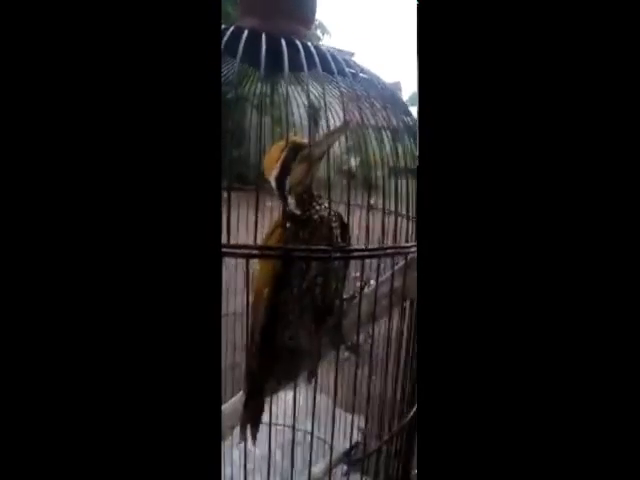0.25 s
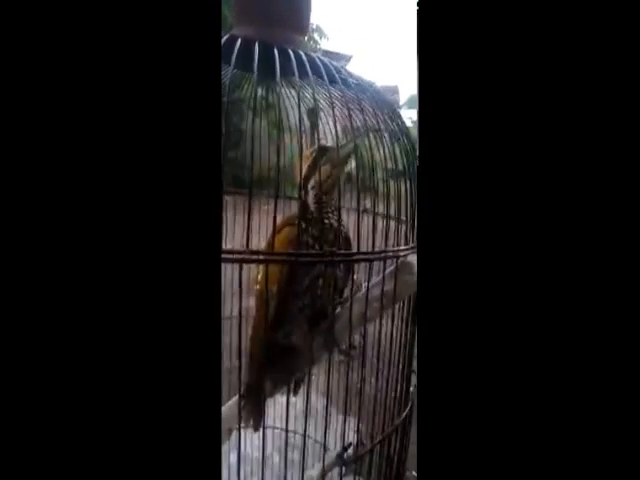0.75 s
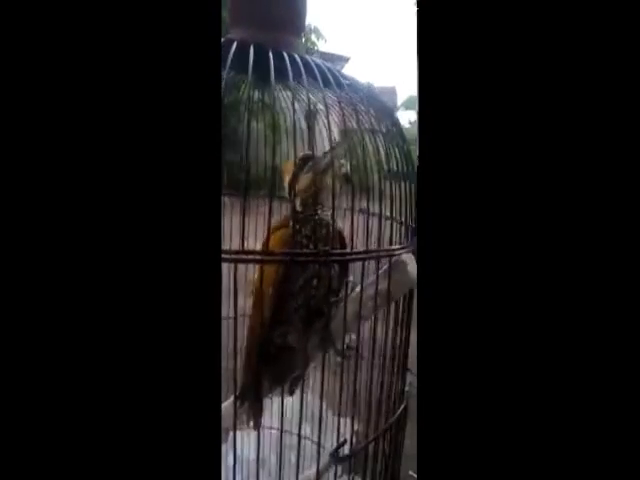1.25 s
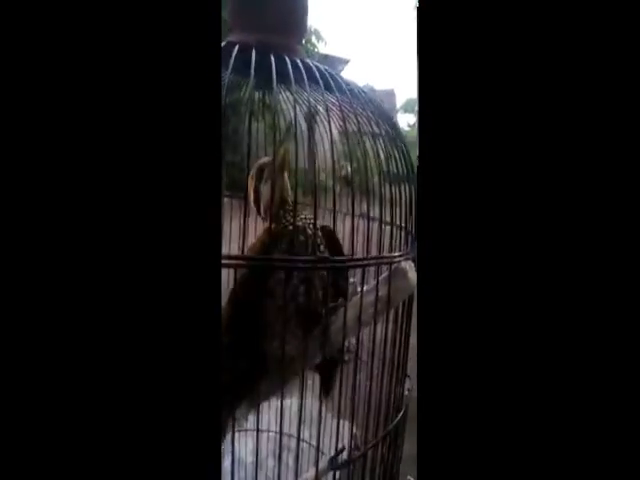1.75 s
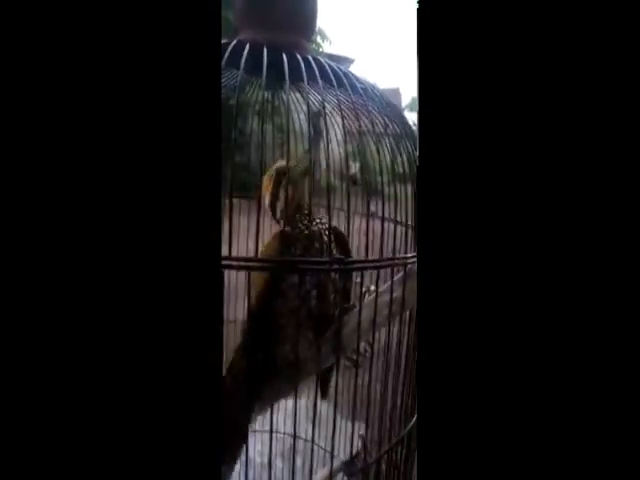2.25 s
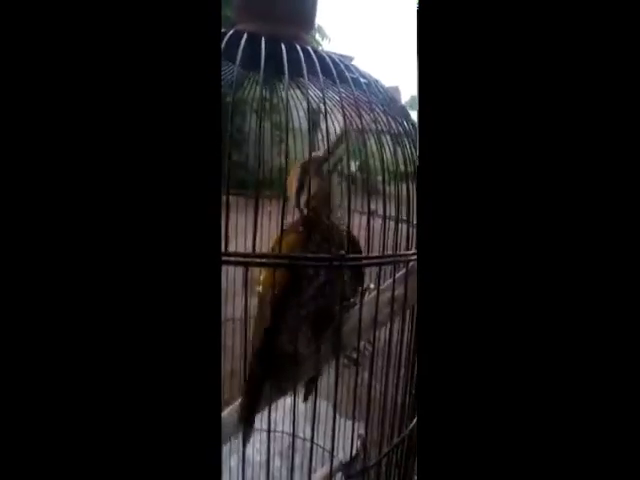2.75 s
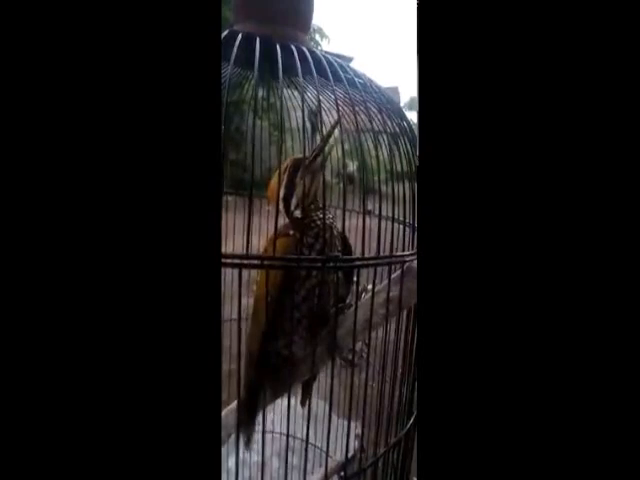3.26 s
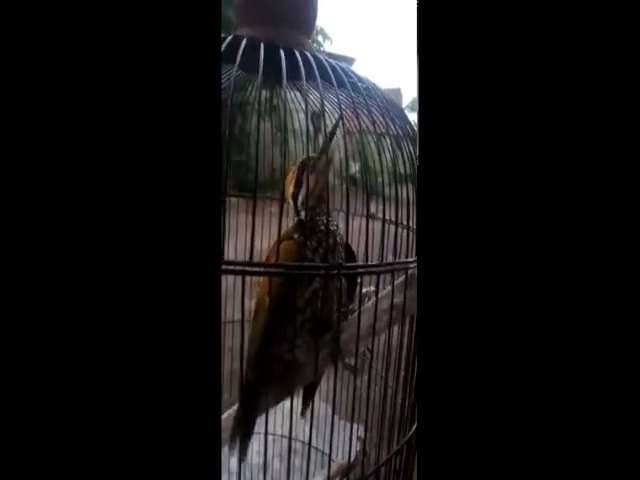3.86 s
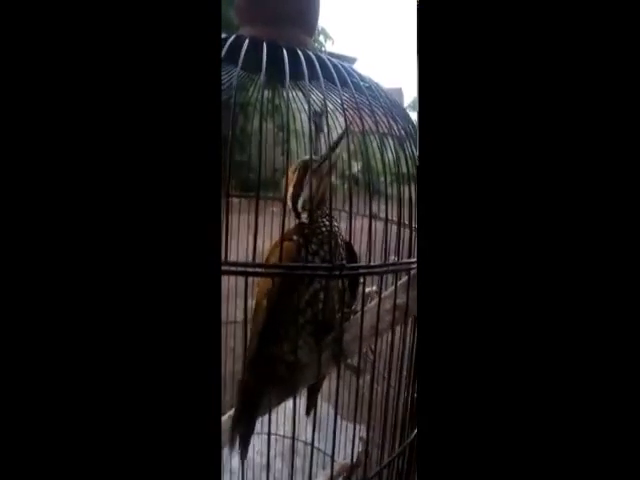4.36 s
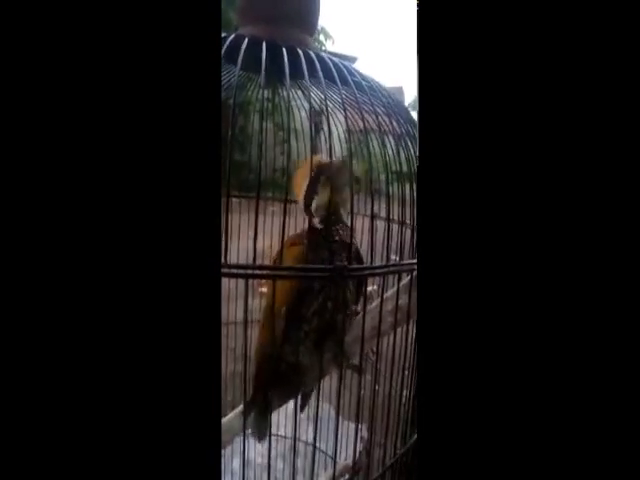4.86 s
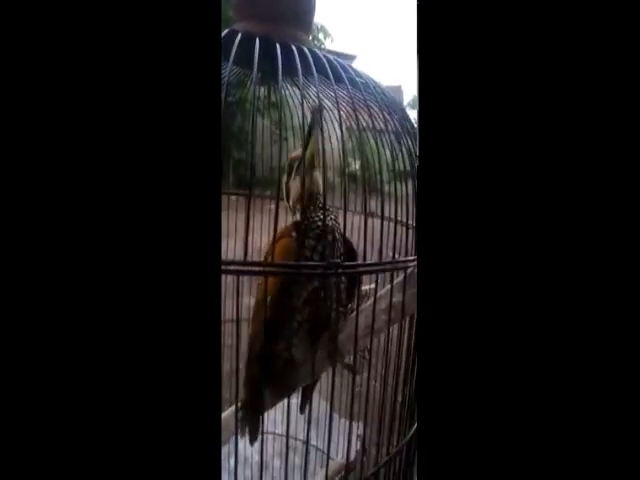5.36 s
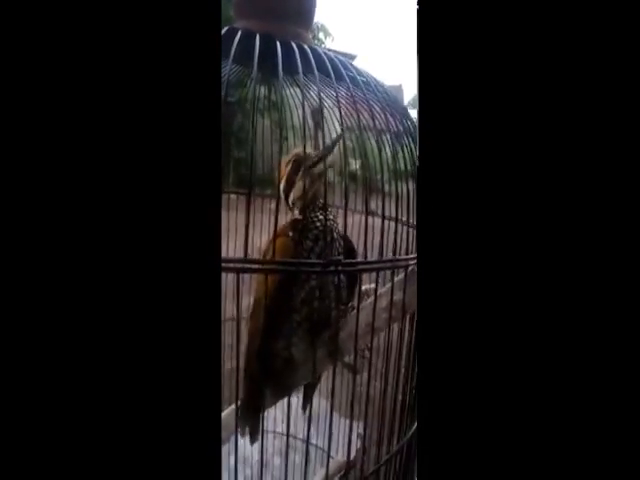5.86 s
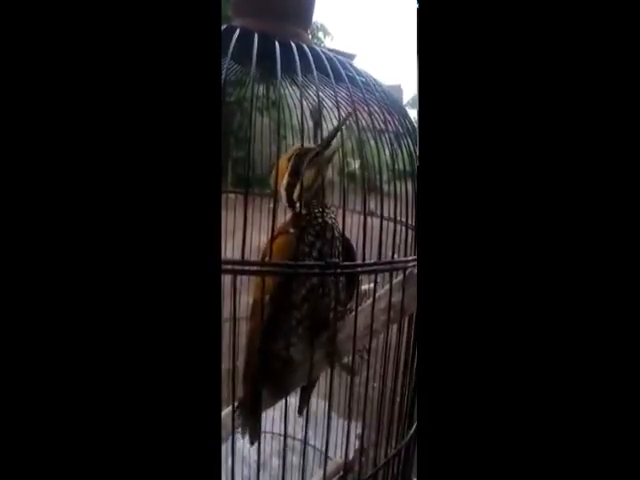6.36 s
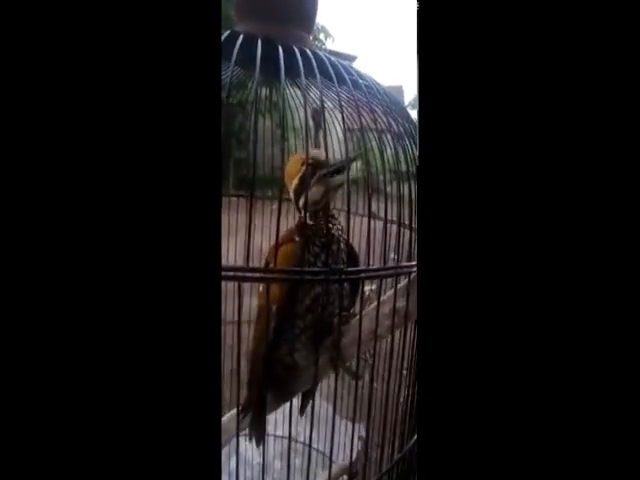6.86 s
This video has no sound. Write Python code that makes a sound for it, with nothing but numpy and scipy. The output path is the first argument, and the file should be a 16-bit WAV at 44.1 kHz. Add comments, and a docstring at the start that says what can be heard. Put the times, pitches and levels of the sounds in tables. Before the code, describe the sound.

On a lightly reverberant porch with dull town rumble, small birds squawk, peep and whistle faintly while a rooster crows far off. Then a caged woodpecker, very close and left of centre, bursts into a rapid chain of short, arched, raspy notes, some cracking into screeches. Late on, the rooster and a whip-like call return beneath the continuing rattle.

```python
"""A bird squawks at once, a higher one squealing over it: gliding tones with overtones, smeared by reflections.
Thin peeps follow, a rooster crows far off, hoarse and wavering, and a whip call and far whistles pass.
Then a woodpecker in a wire cage on a porch rattles, a dozen arched notes a second: swooping, sagging harmonics
with rasps, puffs, sizzle and cracks of noise. Late in the rattle the rooster and a whip call come again.
Throughout, shaped noise gives the low rumble of a town."""
import sys
import numpy as np
from scipy import signal
from scipy.fft import rfft, irfft, next_fast_len
from scipy.io import wavfile

SR = 44100
rng = np.random.default_rng(int(sys.argv[2]) if len(sys.argv) > 2 else 0)


def materialize(psi):
    """Save the field psi as 16-bit PCM at rate SR to the path in sys.argv[1].

    A 1-D psi becomes a single channel; in a 2-D psi each row is a channel.
    """
    bounded = np.clip(np.atleast_2d(psi).T, -1, 1)
    quanta = np.round(bounded * 32767).astype(np.int16)
    wavfile.write(sys.argv[1], SR, quanta)


N = 313992
TIME = np.arange(N) / SR   # seconds
# a rasp comes first, then a puff, then the voice, each this long before a note's nominal start
RASP_LEAD_S, PUFF_LEAD_S, VOICE_LEAD_S = .018, .0086, .006

# harmonics of a note, fundamental first:
# [gain_db, gain per unit of sag_db, gain_db per dB of fullness, left over right_db]
HARMONIC_MIX = [(-3, -6.5, 1.0, 11.5), (-6.5, 6, 0.22, 12.5), (-4, -1.5, -0.03, 12.5), (-13.5, -4, 0.55, 2)]


def rattle(left_lag_s=.00019, unsteady_db=2.5):
    """Each note swoops up, holds and sags, further the longer it lasts; the syrinx is unsteady as it starts."""
    since, length, level_db, rough, fullness = note_clock()
    share = np.clip(since / length, 0, 2)
    # the arch leans early or late
    share = share + 0.078 * waver(7.87) * np.sin(np.pi * np.minimum(share, 1))
    elapsed = np.maximum(TIME - NOTES[0][0], 0)

    # pitch: a swoop up to the top, a climb that slows as the bird tires, an ever faster sag
    swoop_s = .0034
    swoop = 1.6 * np.clip(2 * (1 - since / swoop_s), 0, 1)
    climb = .4 * elapsed * np.maximum(1 - share / .45, 0) ** 2
    droop = 2.0 * abs(share) ** 3.8
    sag = np.minimum(swoop + climb + droop, 2.7)
    # higher when the voice is full, sinking 8 Hz a second
    top_hz = 1814 + 2.5 * fullness - 8 * elapsed
    sag_per_s = 4.0   # pitch share lost per unit of sag and second of note
    unsteady = 1 + .01202 * waver(321) + .008 * waver(8)
    pitch_hz = top_hz * (1 - sag * sag_per_s * length) * unsteady
    phase = 2 * np.pi * np.cumsum(pitch_hz) / SR

    # roughness: drifts slowly, and frays as the note starts
    fray = 7 * np.clip(1 - 2 * since / swoop_s, 0, 1)
    rough = np.clip((rough + 0.014) * from_db(4.5 * waver(7)) * (1.67 + fray), 0, 1)

    # loudness: an accent as the pitch reaches its top, then a hold and a quick cut
    accent_db = 2.5 * np.exp(-((since - swoop_s) / .0011) ** 2)
    swell = envelope(since + VOICE_LEAD_S, attack_s=.0095, hold_s=VOICE_LEAD_S + .88 * length, release_s=.016)
    swell = swell * from_db(level_db + accent_db) / np.sqrt(1 + rough ** 2)

    rough_hz = 750
    flutter, out = waver(rough_hz), 0
    for k, (db, sag_db, full, pan_db) in enumerate(HARMONIC_MIX, 1):
        tone = (1 + rough * flutter) * np.sin(k * phase + rough * waver(rough_hz) + waver(10.2))
        gain_db = db + sag_db * np.minimum(sag, 1) + full * fullness + unsteady_db * waver(144)
        out = out + leftward(tone * swell * from_db(gain_db), pan_db)
    return np.array([delayed(out[0], left_lag_s), out[1]])


# notes of the rattle: [start_s, length_s, level_db before accent and harmonic mix]
NOTES = [(2.791, 0.022, -15.5), (2.862, 0.023, -16), (2.931, 0.025, -14.5), (3.001, 0.023, -14.0),
         (3.07, 0.023, -15.0), (3.142, 0.021, -13.5), (3.213, 0.022, -15.0), (3.287, 0.02, -14.5),
         (3.362, 0.021, -12.5), (3.435, 0.025, -15.0), (3.511, 0.025, -16.5), (3.586, 0.023, -15.5),
         (3.664, 0.022, -15), (3.742, 0.024, -15.5), (3.821, 0.025, -15.5), (3.901, 0.024, -16.5),
         (3.984, 0.024, -15), (4.07, 0.021, -14), (4.152, 0.021, -14.5), (4.233, 0.022, -15.0),
         (4.313, 0.021, -14.5), (4.394, 0.025, -14.5), (4.475, 0.025, -14.5), (4.561, 0.031, -16.0),
         (4.664, 0.031, -17.0), (4.775, 0.031, -14.5), (4.863, 0.029, -15.0), (4.947, 0.027, -14.5),
         (5.03, 0.028, -16.0), (5.116, 0.023, -12.5), (5.2, 0.024, -15), (5.289, 0.023, -13.5),
         (5.374, 0.022, -13.5), (5.459, 0.022, -14.0), (5.548, 0.024, -16.0), (5.635, 0.022, -14.5),
         (5.718, 0.025, -15.0), (5.811, 0.029, -16.0), (5.918, 0.024, -14), (6.011, 0.031, -14.5),
         (6.1, 0.026, -15.0), (6.187, 0.024, -14), (6.274, 0.025, -13), (6.365, 0.023, -14.5),
         (6.455, 0.025, -16), (6.544, 0.031, -15.5), (6.635, 0.027, -16.0), (6.736, 0.027, -15.0),
         (6.838, 0.028, -15.0), (6.943, 0.028, -15.5), (7.052, 0.027, -13)]
# fullness of the voice, as fundamental over third harmonic: [time_s, fullness_db]
FULLNESS = [(2.8, -3.5), (2.87, 1.5), (3.3, -2.3), (3.52, 0.18), (3.83, -5.5), (4.0, 2.5), (4.24, -3),
            (4.32, 2), (4.49, 1.07), (4.68, -6.5), (4.79, -2.5), (5.21, -4), (5.39, 5.5), (5.56, 0.4),
            (5.73, 1.1), (6.03, -6), (6.11, -0.07), (7.06, -4)]


def note_clock():
    """For each moment: time since its note's start, and that note's length, level, base roughness, fullness."""
    start, length, level_db = np.transpose(NOTES)
    rough = np.full(len(start), .048)
    screeching = [np.argmin(abs(start - s)) for s, _ in SCREECHES]
    rough[screeching] = .1
    fullness, = along(FULLNESS, start + length / 2)
    now = np.maximum(np.searchsorted(start - RASP_LEAD_S, TIME) - 1, 0)   # the rasp opens each turn
    return TIME - start[now], length[now], level_db[now], rough[now], fullness[now]


# throat and open beak pass four broad bands with hollows between: [frequency_hz, gain_db]
THROAT = [(1850, 0), (2300, -4), (2800, -0.5), (3650, 0), (4150, -7), (4750, 0.5), (5500, 0), (6100, -9),
          (6750, 0)]


def voice_through_throat():
    """The rattle's harmonics filtered by the resonances of throat and open beak."""
    return colour(rattle(), THROAT)


# balance of the rasp: [frequency_hz, relative density_db per Hz]
RASP = [(400, -29), (800, -13.5), (1150, 5), (2000, 4), (3100, 1.5), (4300, -9), (5300, 14.5), (6300, -82),
        (8000, -34), (12000, -10), (15000, -25)]
# balance of the low puff: [frequency_hz, relative density_db per Hz]
PUFF = [(25, -8.5), (70, 2.5), (150, 0.5), (260, -5.5), (450, -9.5), (750, -20), (1300, -54)]
# loudness ride for puff, sizzle and shimmer: [time_s, gain_db]
AIR_LEVEL = [(2.8, -3), (3.4, -2), (3.9, -1), (4.2, 2), (4.85, -1), (5.15, 1), (5.4, 1.5), (5.9, 3),
             (6.45, 2.5), (7.1, -2)]


def rattle_air():
    """Breath noise: a rasp and a puff of air lead into each note, and both go on under it."""
    since, length, _, rough, _ = note_clock()
    rasp_lead = envelope(since + RASP_LEAD_S, attack_s=.0041, hold_s=.0094, release_s=.021)
    rasp_under = envelope(since + VOICE_LEAD_S, attack_s=.0056, hold_s=VOICE_LEAD_S + length, release_s=.035)
    rasp_under_db = -32 - 480 * np.maximum(since, 0)   # fades 480 dB a second
    rasping = from_db(-36) * rasp_lead + from_db(rasp_under_db) * rasp_under
    rasp = leftward(air_noise(RASP), pan_db=5.5) * rasping * from_db(2.56 * waver(8.5))

    puff_lead = envelope(since + PUFF_LEAD_S, attack_s=.0028, hold_s=.0054, release_s=.026)
    puff_under = envelope(since, attack_s=.0022, hold_s=.015, release_s=.025)
    puffing = from_db(-31) * puff_lead + from_db(-35) * puff_under
    puff_ride_db = along(AIR_LEVEL, TIME)[0] + 1.6 * waver(4.0)
    puff = leftward(air_noise(PUFF), pan_db=33) * puffing * from_db(puff_ride_db)
    return rasp * (.5 + 10 * rough) + puff   # hoarse notes leak more air


# balance of the sizzle: [frequency_hz, relative density_db per Hz]
SIZZLE = [(6500, -59), (8000, -25.5), (9000, 8.5), (9800, 2.5), (11000, 3.5), (12800, 10.5), (13700, 0.5),
          (15000, -37)]
# thin high tones that shimmer along with the rattle: [frequency_hz, relative level_db]
SHIMMER = [(8437, -59), (9188, -51.5), (9938, -57.5), (10687, -55.5), (11438, -57), (12188, -55),
           (12937, -53), (14062, -62)]


def rattle_treble(flicker_db=7, shimmer_gain_db=9, linger_s=.028):
    """Noise sizzles on each note, more so the fuller ones; a faint hiss and flickering tones decay after it."""
    since, *_, fullness = note_clock()
    burst = envelope(since + .0034, attack_s=.0066, hold_s=.018, release_s=.025)
    lead = envelope(since + RASP_LEAD_S, attack_s=.0015, hold_s=.006, release_s=.015)
    keep = np.exp(-1 / (linger_s * SR))
    lingering = signal.lfilter([1 - keep], [1, -keep], burst + 1e-18)   # offset avoids vanishing numbers
    sizzling = from_db(-34) * burst + from_db(-54) * lead + from_db(-46) * lingering
    sizzle = air_noise(SIZZLE) * sizzling * from_db(.51 * fullness)
    tones = 0
    for hz, db in SHIMMER:
        flicker = from_db(db + flicker_db * np.tanh(waver(8.8)))
        tones = tones + np.sin(2 * np.pi * hz * TIME) * flicker
    shimmer = tones * lingering * from_db(shimmer_gain_db)
    return leftward((sizzle + shimmer) * from_db(along(AIR_LEVEL, TIME)[0]), pan_db=2.5)


# notes that break into a screech: [time_s, direct level_db]
SCREECHES = [(3.143, -30), (3.287, -29), (3.435, -31), (4.477, -23), (4.666, -21.5), (6.637, -21.5),
             (6.74, -29), (6.942, -20.5)]
# balance of the screech: [frequency_hz, relative density_db per Hz]
SCREECH_COLOUR = [(800, -24), (1500, -2.5), (2400, 1), (3300, 11), (4300, -14), (5300, 13), (6500, -11),
                  (9000, -57)]


def screeches(length_s=.016, wet_db=-9):
    """Now and then the voice cracks into a short swell of noise, which hangs in the porch."""
    swell = sum(from_db(db) * np.sin(np.pi * np.clip((TIME - s) / length_s, 0, 1)) for s, db in SCREECHES)
    direct = air_noise(SCREECH_COLOUR) * swell
    tail = from_db(wet_db) * scatter(direct[0], t60_scale=.59, build_s=.0036)
    return leftward(direct + tail, pan_db=11)


# close reflections off the tray and dome of the cage: [delay_s, gain_db]
CAGE_ECHOES = [(.0026, -33), (.0057, -16), (.0092, -23)]


def cage(voice):
    """Close reflections interfere with the voice and break up its gliding harmonics."""
    return leftward(reflections(voice, CAGE_ECHOES, right_path=.98), pan_db=10.5)


# reflections off the porch walls: [delay_s, gain_db before colour]
PORCH_ECHOES = [(.034, -43), (.047, -24)]
# tone of the porch's reflected sound: [frequency_hz, gain_db]
PORCH_COLOUR = [(500, 5), (1900, -8), (3400, 0.5), (5600, 0.5), (7100, 12), (8000, -6)]


def porch(voice):
    """Two distinct wall reflections and a light diffuse tail, coloured together."""
    tail = from_db(-21) * scatter(voice, t60_scale=.95, build_s=.013)
    echoes = reflections(voice, PORCH_ECHOES, right_path=.75)
    return leftward(colour(echoes + tail, PORCH_COLOUR), pan_db=11)


# rising whip calls: [start_s, length_s, from_hz, to_hz, level_db before distance]
WHIPS = [(1.892, .063, 1254, 3626, -24.5), (6.543, .055, 1480, 4112, -22)]


def whip_calls():
    """Short tones sweep steeply upward, heard directly and through an early and a later scatter."""
    whips = sum(call(row, [0, -30, -38], attack_share=.63, release_s=.048, jitter=.024, jitter_hz=496,
                     bend=1.05) for row in WHIPS)
    early = from_db(-5.5) * scatter(whips, t60_scale=.39, build_s=.006)
    late = from_db(-20) * scatter(whips, t60_scale=1.2, build_s=.021)
    return leftward(from_db(-5.0) * whips + early + late, pan_db=16.0)


# another bird's squawk: start_s, length_s, from_hz, to_hz, level_db before distance
SQUAWK = (0, 0.21, 1000, 944.5, -41)
# the squawk's harmonics, from the first up: [gain_db]
SQUAWK_HARMONICS = [-2.5, -12, -2, -7, -15.5, -15, -33, -21.5, -26, -14, -19, -26, -22]
# a higher bird that overlaps it: start_s, length_s, from_hz, to_hz, level_db before distance
SQUEAL = (0, 0.0221, 2984, 3010.5, -31.5)


def squawk_and_squeal():
    """A many-harmonic tone with unequal alternate cycles, and a higher bird's tone over it."""
    squawk = call(SQUAWK, SQUAWK_HARMONICS, attack_share=.0071, release_s=.15, jitter=.017, jitter_hz=204,
                  bend=3.03, arch=.07, rasp=.61)
    squeal = call(SQUEAL, [0, -24], attack_share=.061, release_s=.26, jitter=.02, jitter_hz=200)
    return squawk + squeal


# thin hissy peeps: [start_s, length_s, from_hz, to_hz, level_db before distance]
PEEPS = [(0.438, .2, 5710, 5080, -59.5), (0.648, 0.76, 5170, 4250, -68), (1.46, .17, 7200, 3020, -56.5),
         (1.625, 0.027, 7950, 10900, -60.5), (2.65, .12, 2000, 2500, -57.5)]
# thin far whistles: [start_s, length_s, from_hz, to_hz, level_db before distance]
WHISTLES = [(2.388, 0.112, 4250, 4300, -63.5), (2.58, 0.15, 3100, 4000, -62),
            (2.681, 0.083, 4500, 5300, -59)]


def peeps_and_whistles():
    """Fast pitch jitter makes the peeps hissy; the whistles are clear tones, one almost level and two rising."""
    peeps = sum(call(row, [0, -16], attack_share=.14, release_s=.18, jitter=.085, jitter_hz=650,
                     bend=.6) for row in PEEPS)
    whistles = sum(call(row, [0], attack_share=.57, release_s=.17, jitter=.0047, jitter_hz=101.8,
                        bend=.7) for row in WHISTLES)
    return peeps + whistles


def neighbours():
    """Birds a few steps away and beyond, heard as much by reflection as directly."""
    others = squawk_and_squeal() + peeps_and_whistles()
    reflected = from_db(-5) * scatter(others, t60_scale=.63, build_s=.008)
    return whip_calls() + leftward(from_db(-5.5) * others + reflected, pan_db=11.5)


# syllables of the rooster's crows: [start_s, length_s, from_hz, to_hz, level_db before distance]
CROWS = [(.995, 0.1, 528.5, 618.5, -50), (1.155, 0.062, 596, 615.5, -46.5), (1.325, .38, 704, 699.3, -48.5),
         (2.02, .3, 644, 588, -51), (6.23, 0.288, 759.5, 755.7, -52.5), (6.71, .41, 744, 760, -55)]


def rooster(broken_db=2.5):
    """Far crowing: two harmonics with unsteady pitch and broken level, smeared between houses."""
    crow = sum(call(row, [0, -14], attack_share=.2, release_s=.13, jitter=.019, jitter_hz=79.6,
                    bend=3.03, arch=.04) for row in CROWS)
    crow = crow * from_db(broken_db * waver(25))
    smear = from_db(-2.5) * scatter(crow, t60_scale=1.42, build_s=.0067)
    return leftward(from_db(-1) * crow + smear, pan_db=5.5)


# balance of the town: [frequency_hz, relative density_db per Hz]
TOWN = [(20, -9), (45, -6.5), (80, 2.5), (150, -0.5), (230, 0), (320, -15.5), (520, -14.5), (800, -25.5),
        (1150, -25.5), (1700, -58), (2400, -49), (3600, -33.5), (5200, -50.5), (7000, -65), (15000, -48)]
# loudness ride of the town: [time_s, level_db before its slow wavering]
TOWN_LEVEL = [(0, -43), (.7, -45), (1.3, -46.5), (3.3, -46.5), (4.8, -45.5), (7.1, -45.5)]


def town():
    """Low rumble: noise weighted to the bass, its level wavering slowly."""
    level_db = along(TOWN_LEVEL, TIME)[0] + 2.36 * waver(3.44)
    return leftward(air_noise(TOWN), pan_db=5.5) * from_db(level_db)


def call(row, harmonics_db, attack_share, release_s, jitter, jitter_hz, bend=1, arch=0, rasp=0):
    """A gliding, unsteady tone with overtones; arch lifts the middle, rasp makes alternate cycles unequal."""
    start, length, from_hz, to_hz, level_db = row
    on = (TIME > start) & (TIME < start + length + release_s)
    since, out = TIME[on] - start, np.zeros(N)
    share = np.minimum(since / length, 1)
    glide_hz = from_hz * (to_hz / from_hz) ** (share ** bend)   # bend under 1 glides early, over 1 late
    pitch_hz = glide_hz * (1 + arch * np.sin(np.pi * share))
    pitch_hz = pitch_hz * (1 + jitter * waver(jitter_hz, size=len(since)))
    phase = 2 * np.pi * np.cumsum(pitch_hz) / SR
    tone = sum(from_db(level_db + db) * np.sin(k * phase) for k, db in enumerate(harmonics_db, 1))
    swell = envelope(since, attack_share * length, length, release_s)
    out[on] = np.sqrt(2) * tone * swell * (1 + rasp * np.sin(phase / 2))
    return out


def envelope(since, attack_s, hold_s, release_s):
    """Rises over the attack, holds until hold_s after its start, then loses 60 dB in release_s."""
    rise = np.clip(since / attack_s, 0, 1) ** 2
    return rise * np.exp(-np.log(1000) * np.clip((since - hold_s) / release_s, 0, 10))


# how alike noise is left and right: [frequency_hz, correlation 0-1]
LIKENESS = [(60, 0.92), (290, 0.97), (640, 0.63), (1400, 0.18), (6000, 0.077), (15000, 0.16)]


def air_noise(spectrum):
    """Stereo noise of a given colour, most alike on both sides in the bass; rms 1."""
    size = next_fast_len(N)
    hz = np.arange(size // 2 + 1) * SR / size
    mid, side = rfft(rng.standard_normal((2, size)))
    alike = np.clip(at_hz(LIKENESS, hz), -1, 1)
    both = np.sqrt(1 + alike) * mid + np.sqrt(1 - alike) * side * [[1], [-1]]
    return rms_one(irfft(both * from_db(at_hz(spectrum, hz)), size)[:, :N])


# ring time of diffuse reflections, before each use scales it: [frequency_hz, t60_s]
RING_TIME = [(300, 0.59), (1800, 0.79), (3500, 0.51), (5500, 0.52), (12000, 0.59)]


def scatter(x, t60_scale, build_s):
    """Diffuse reflections of unit energy that build up, then die band by band."""
    t = np.arange(SR) / SR
    edges_hz, tail = np.geomspace(150, 16000, num=8), 0
    for low, high in zip(edges_hz, edges_hz[1:]):
        sos = signal.butter(2, [low, high], "band", fs=SR, output="sos")
        band = signal.sosfilt(sos, rng.standard_normal((2, SR)))
        t60_s = t60_scale * at_hz(RING_TIME, np.sqrt(low * high))
        tail = tail + band * np.exp(-np.log(1000) * t / t60_s)
    tail = tail * (1 - np.exp(-t / build_s))
    return signal.fftconvolve(x[None], rms_one(tail) / np.sqrt(SR), axes=1)[:, :N]


def reflections(x, rows, right_path):
    """Delayed copies; right_path multiplies the delays on the right."""
    return np.array([sum(from_db(db) * delayed(x, s * path) for s, db in rows) for path in (1, right_path)])


def delayed(x, delay_s):
    """A later copy, interpolated between samples."""
    return np.interp(TIME - delay_s, TIME, x, left=0, right=0)


def colour(x, spectrum):
    """Filters a sound by a gain curve in the frequency domain."""
    size = next_fast_len(N + SR // 10)
    hz = np.arange(size // 2 + 1) * SR / size
    return irfft(rfft(x, size) * from_db(at_hz(spectrum, hz)), size)[..., :N]


def leftward(x, pan_db):
    """The right microphone hears less than the left."""
    return x * from_db([[0], [-pan_db]])


def waver(rate_hz, size=N):
    """Random motion, low-passed at a given rate; rms 1."""
    sos = signal.butter(2, min(rate_hz, SR / 4), fs=SR, output="sos")
    return rms_one(signal.sosfilt(sos, rng.standard_normal(size + SR))[SR:])   # drops the filter's start-up


def at_hz(points, hz):
    """A spectrum read on a log-frequency axis."""
    f, value = np.transpose(points)
    return np.interp(np.log(np.maximum(hz, 1)), np.log(f), value)


def along(rows, where):
    """Columns of a table, joined by straight lines."""
    first, *columns = np.transpose(rows)
    return [np.interp(where, first, c) for c in columns]


def from_db(db):
    """Decibels to amplitude."""
    return 10 ** (np.asarray(db) / 20)


def rms_one(x):
    """Scales a signal to rms 1."""
    return x / np.sqrt(np.mean(x ** 2) + 1e-20)


def scene():
    """The woodpecker in its cage and porch, the other birds, the rooster and the town."""
    voice = voice_through_throat()
    bird = voice + rattle_air() + rattle_treble() + screeches()
    return bird + cage(voice[0]) + porch(voice[0]) + neighbours() + rooster() + town()


def record(dry, ceiling=.37, cutoff_hz=14700):
    """The highest peaks are rounded and the top is cut steeply."""
    rounded = dry / (1 + (dry / ceiling) ** 6) ** (1 / 6)
    return signal.sosfilt(signal.ellip(10, .2, 90, cutoff_hz, fs=SR, output="sos"), rounded)


dry = scene()
out = record(dry)
materialize(out)
```